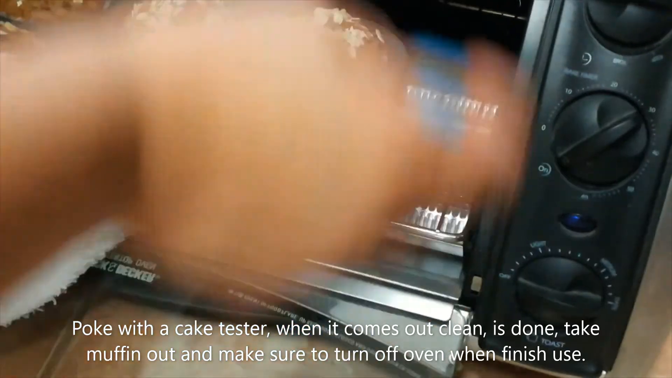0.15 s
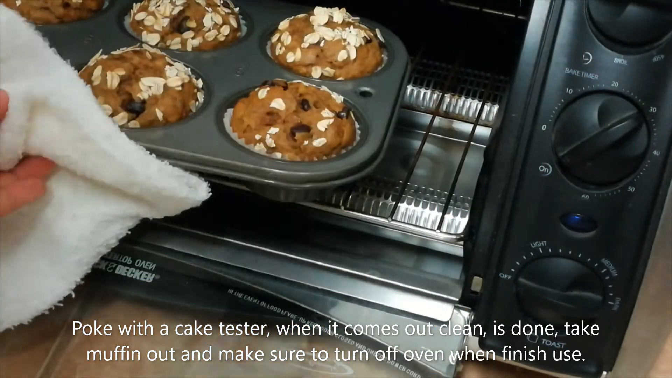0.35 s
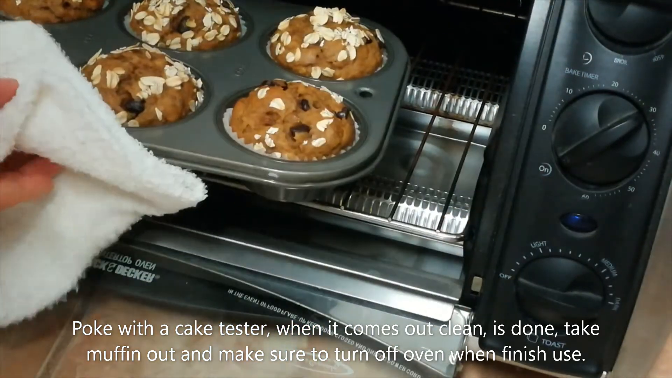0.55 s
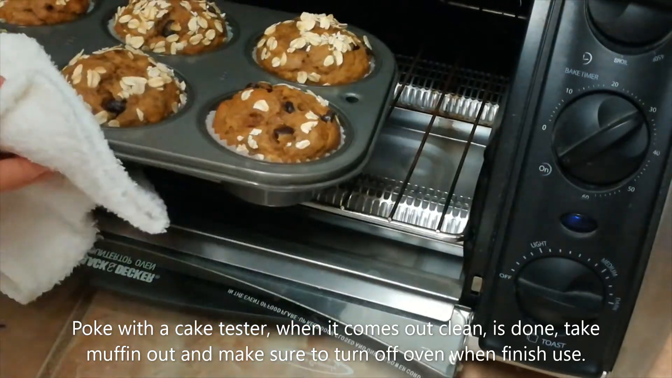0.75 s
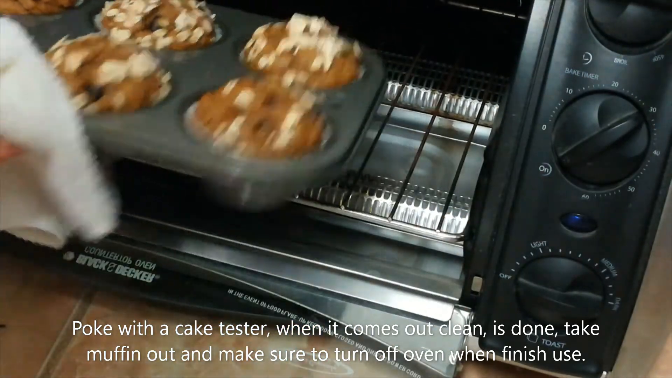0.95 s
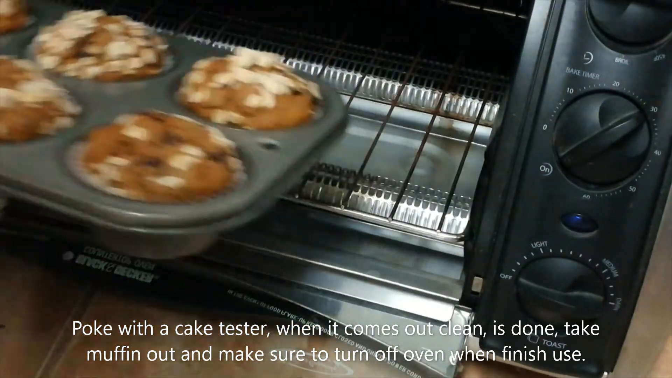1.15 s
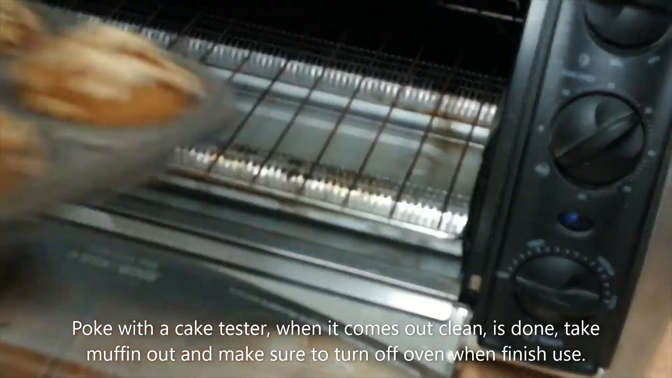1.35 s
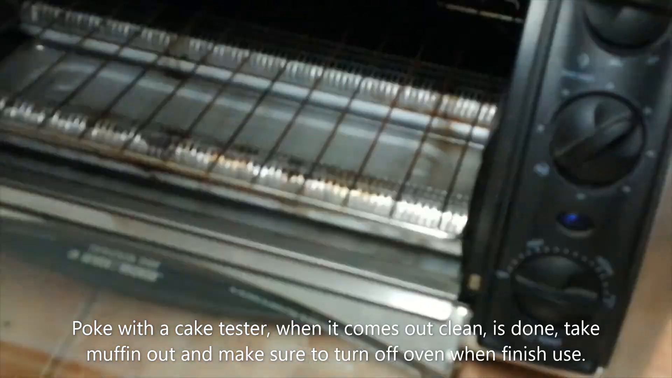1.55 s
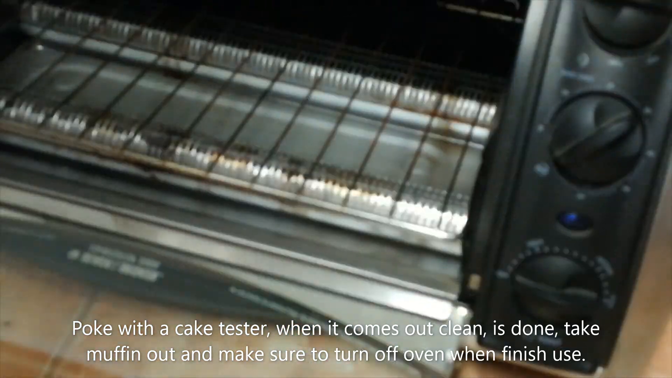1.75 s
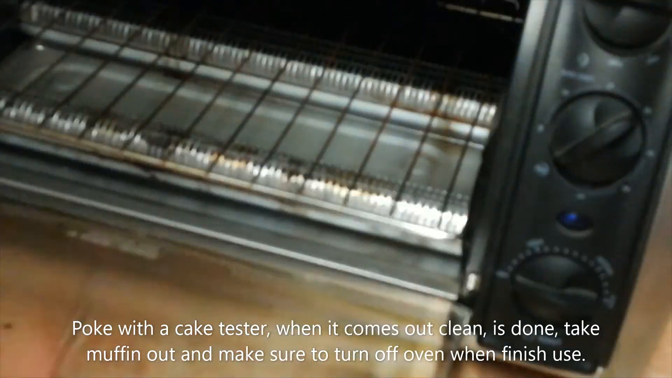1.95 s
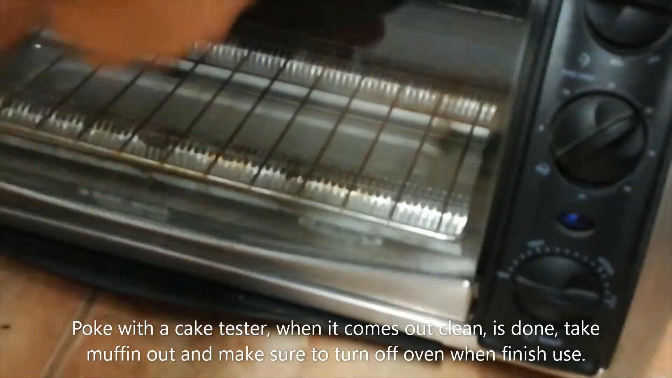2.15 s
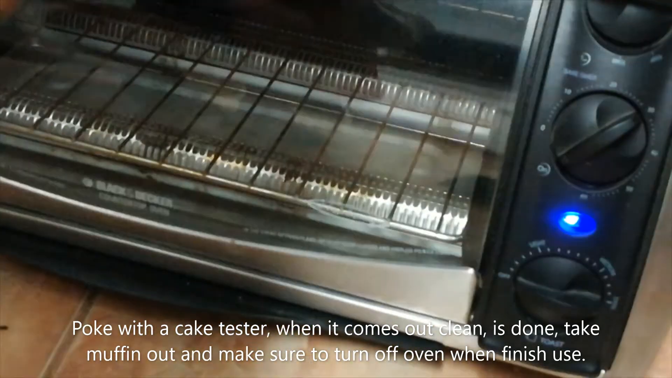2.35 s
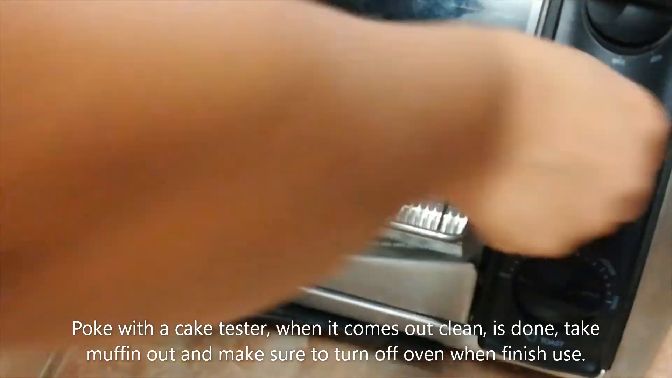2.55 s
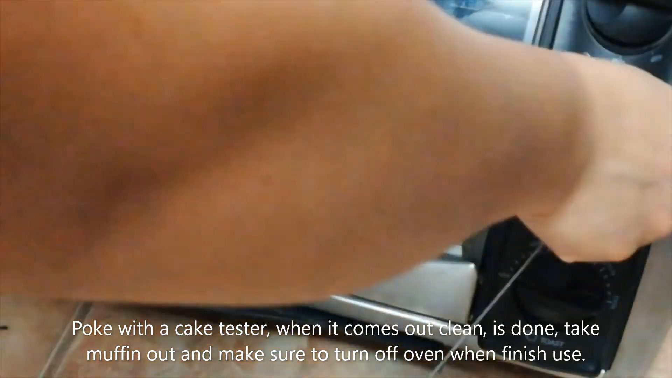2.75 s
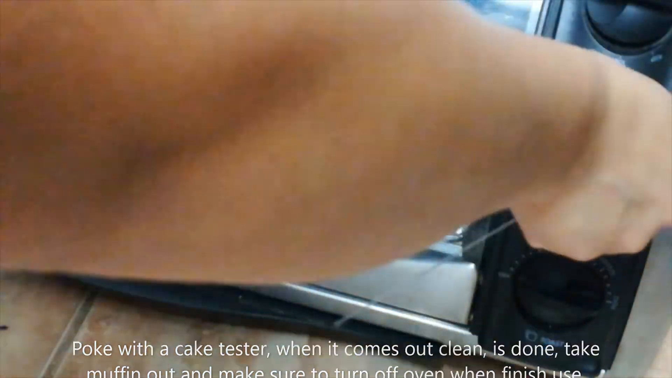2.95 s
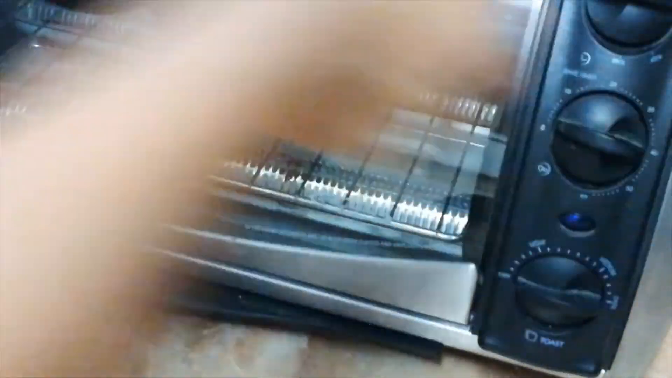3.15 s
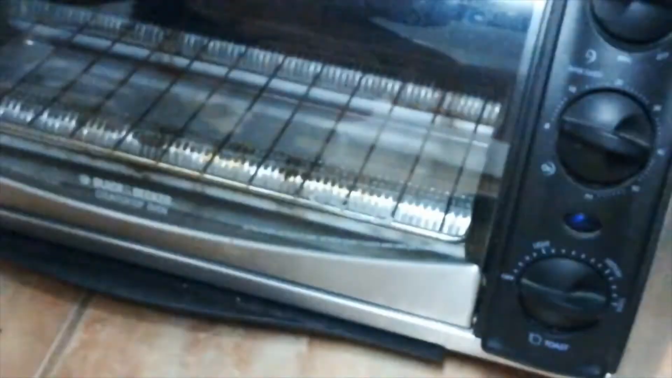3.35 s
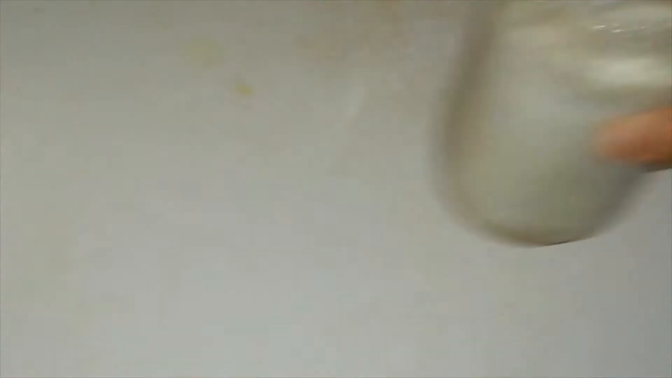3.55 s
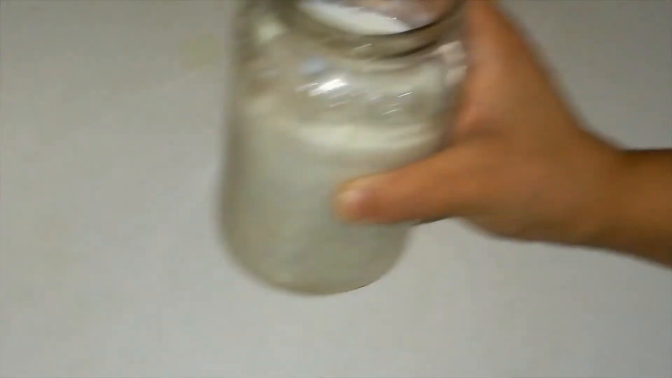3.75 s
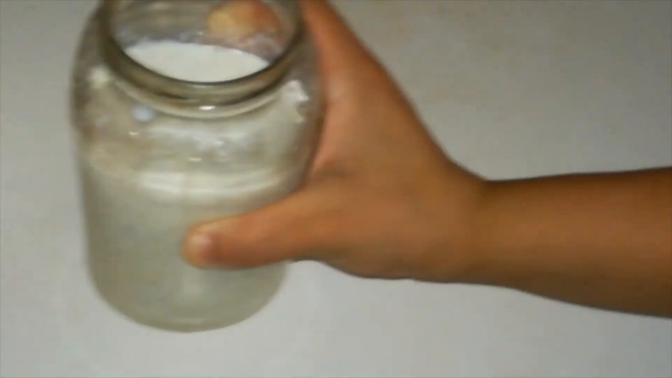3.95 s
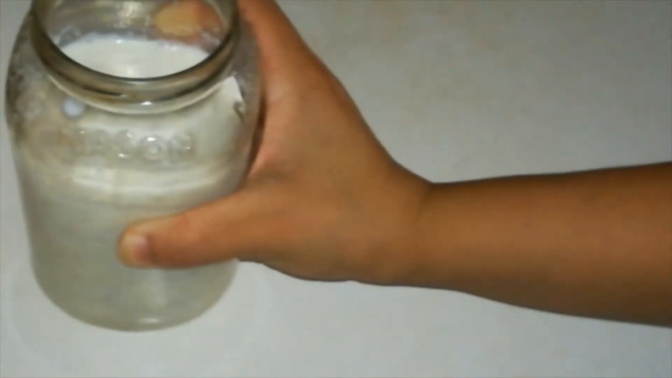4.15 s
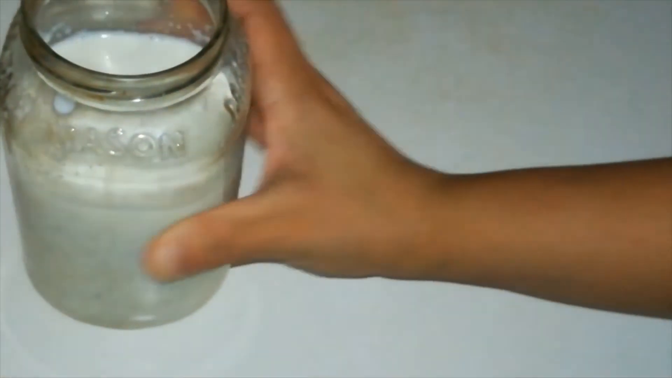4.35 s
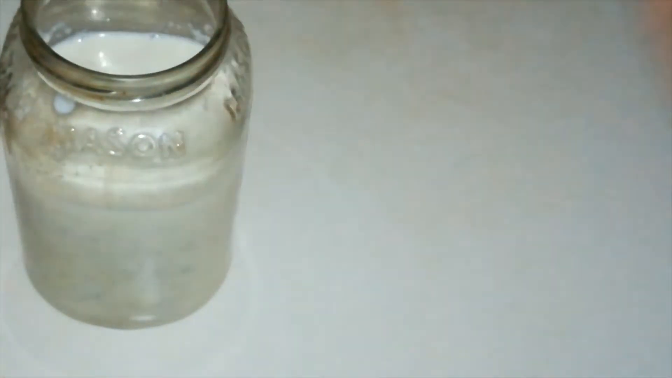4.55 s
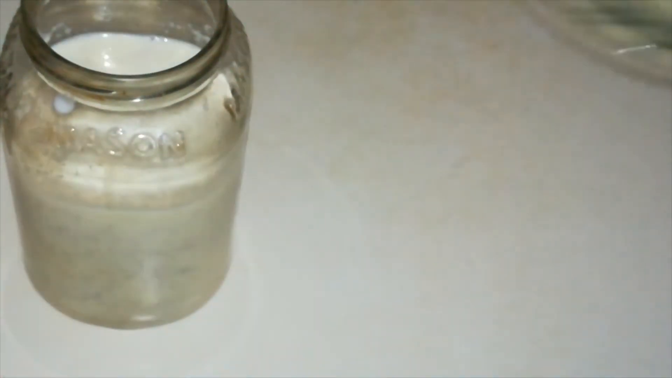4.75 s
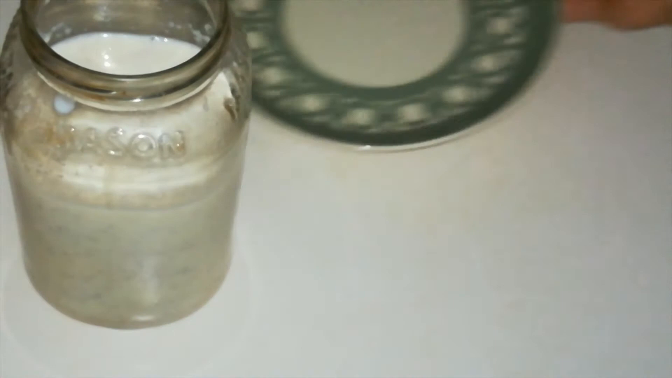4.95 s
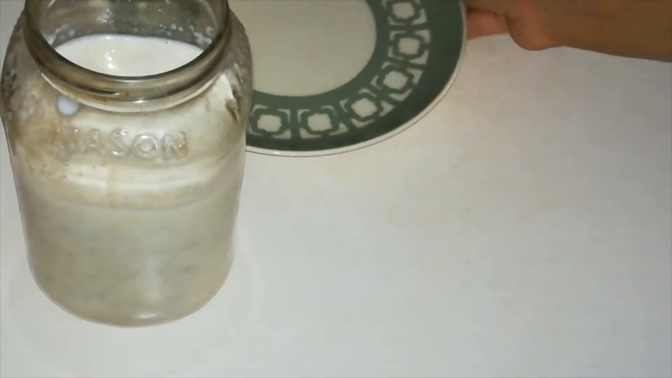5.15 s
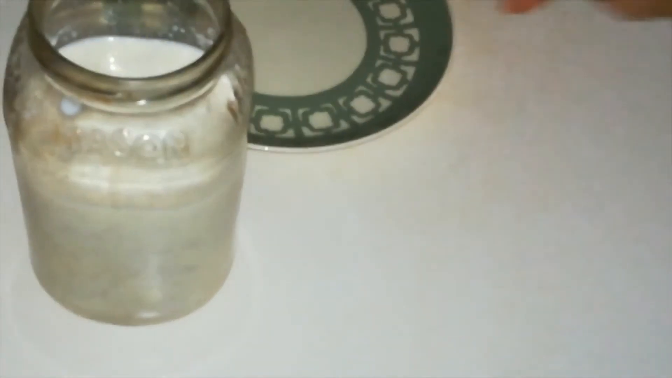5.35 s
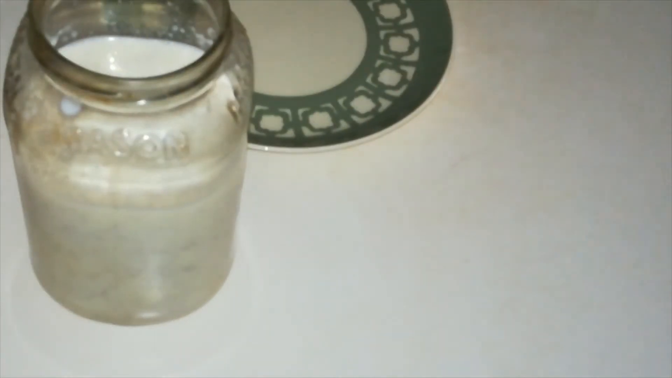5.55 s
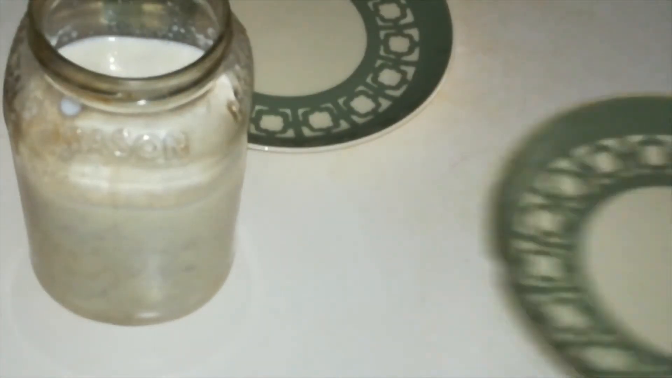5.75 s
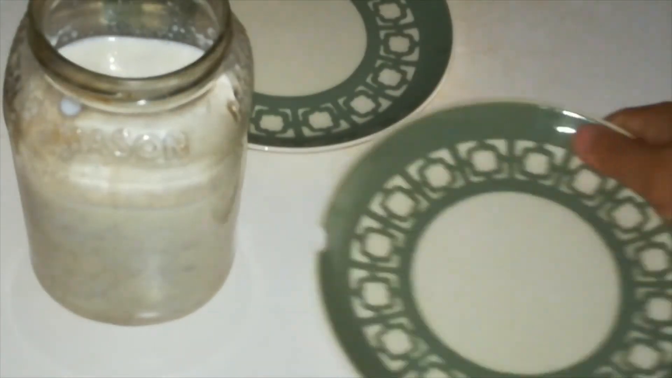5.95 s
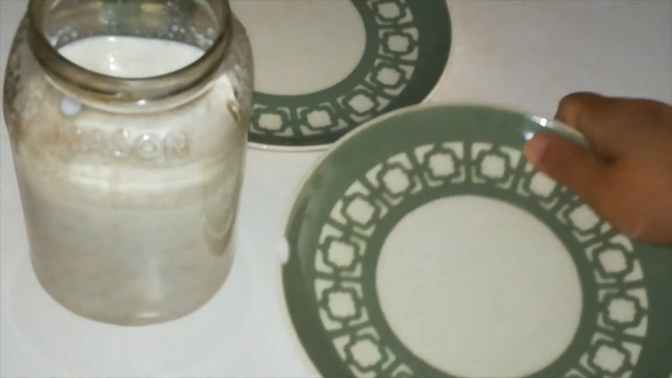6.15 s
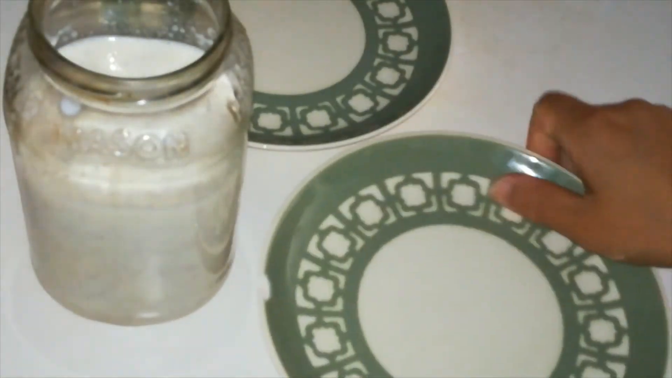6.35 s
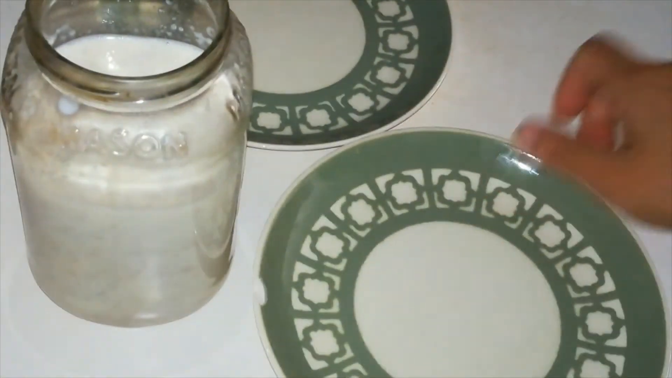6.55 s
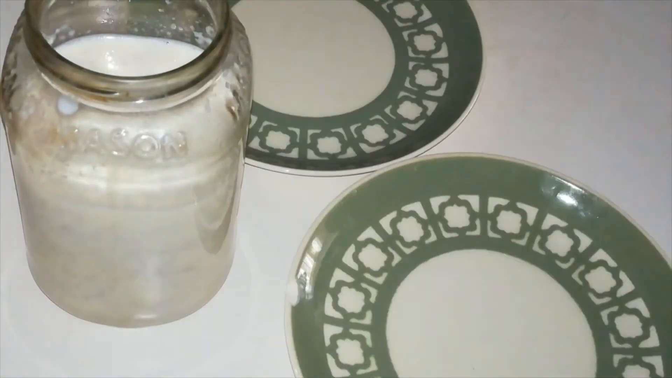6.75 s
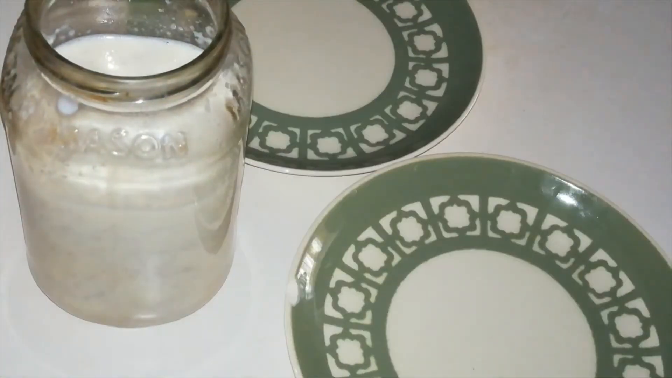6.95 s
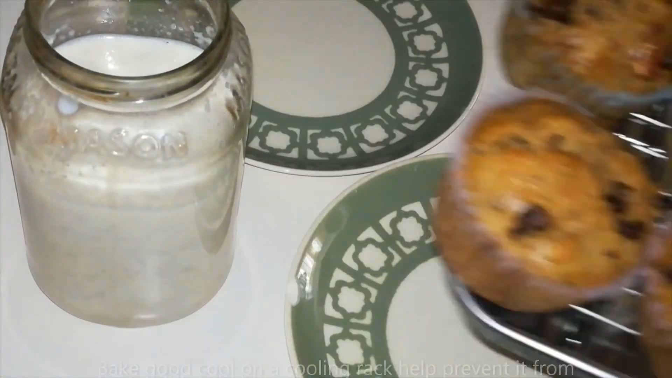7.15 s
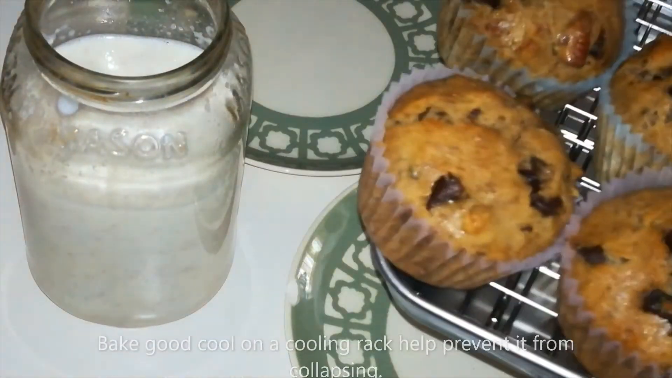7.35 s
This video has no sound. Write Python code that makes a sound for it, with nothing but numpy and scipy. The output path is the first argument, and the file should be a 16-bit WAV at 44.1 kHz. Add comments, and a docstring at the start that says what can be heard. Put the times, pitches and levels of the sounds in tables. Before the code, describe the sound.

First, steady oven hum, soft wire-rack taps and a dry tray scrape; then a brief hinge chirp, rasping metal, a heavy sheet-metal door bang and one clear timer ding with ratchety knob noise. After a short silent join, near-quiet room tone holds a muffled double knock of a filled glass jar, then clattering ceramic plates on a hard tabletop. Near microphones, short indoor reflections, and soft low thumps after the first and last cuts.

```python
"""An oven hums; a baking tray touches and slides off its rack, the door squeaks and slams, a timer knob turns to its bell.
Then, in a quieter room, a full glass jar and two plates are set down on a table, and room tone remains.
Struck bodies are sums of decaying modes; dense clatter and rubbing are shaped noise; a squeak is a harmonic tone.
Short fades join the passages; the microphone settles with a slow thump after the first and last joins."""
import sys
import numpy as np
from scipy import signal
from scipy.fft import rfft, irfft
from scipy.io import wavfile

SR = 44100
rng = np.random.default_rng(int(sys.argv[2]) if len(sys.argv) > 2 else 0)


def digitize_waveform(pressure):
    """Quantize a signal to 16-bit integers and store it at the path in sys.argv[1].

    Rows of a 2-D input are taken as channels; values are limited to [-1, 1].
    """
    field = np.atleast_2d(pressure).T
    bounded = np.clip(field, -1, 1)
    quanta = np.round(bounded * 32767).astype(np.int16)
    wavfile.write(sys.argv[1], SR, quanta)


N = 325678

# Steady hum of the oven: pitch_hz, density_db_per_hz
OVEN_HUM = [(12, -30), (20, 4), (49, -7), (154, -0.5), (241, -9), (357, -5.5), (422, -17.5), (558, -9),
            (607, -24), (698, -8), (825, -14.5), (1480, -16.5), (2080, -23.5), (8890, -25.5),
            (16000, -37.5)]
# Steady tone of the quieter room: pitch_hz, density_db_per_hz
ROOM_TONE = [(12, -37), (20, 1.5), (27, -10.5), (96, -6.5), (134, -12.5), (377, -21.5), (410, -25),
             (446, -15.5), (1090, -20.5), (1400, -21), (1810, -23), (2320, -23.5), (2530, -23), (8410, -24),
             (16000, -34.5)]
OVEN_DB, ROOM_DB = -59, -64.5   # mean levels

# Tray and rack touching: start_s, level_db, favoured_hz, falloff_db_per_octave
TOUCHES = [(0.018, -54, 1470, 30), (0.161, -59, 1380, 22), (0.274, -46.5, 1110, 20), (0.4, -42, 1930, 30),
           (0.447, -55, 1580, 16), (0.625, -46.5, 1500, 14), (0.632, -46, 2890, 25), (0.721, -56, 1600, 8),
           (0.9, -56.5, 1460, 12), (1.087, -55.5, 1430, 8), (1.169, -61, 1530, 16), (1.24, -55.5, 1610, 13),
           (1.4, -59, 1460, 12), (2.243, -42, 1700, 30)]
# Modes of the wire rack: pitch_hz, level_db, t60_s
RACK_MODES = [(995, 4, 0.094), (1111, -1.5, .1), (1190, 2, 0.055), (1479, 0, 0.13), (1584, -2.5, 0.084),
              (1890, -4.5, 0.071), (2056, -8.5, .08), (2886, -5, 0.077), (3550, -5, .06), (3775, -5, 0.07)]
# Scuff of the tray edge on wire: pitch_hz, density_db_per_hz
SCUFF_SPECTRUM = [(600, -22), (1100, -0.5), (2000, 0), (3800, -9), (6000, -20)]
SCUFF_DB = -11.5   # against the ring of the touch

# Metal sliding on metal, for tray, door and knob, and the rattle after the slam: top_s, level_db, rise_20db_s,
# fall_20db_s
SCRAPES = [(0.412, -61, .03, .2), (0.51, -66, .15, .05), (0.746, -60, .15, .07), (0.83, -66, .04, .09),
           (1.008, -44, .03, .11), (1.853, -62, .012, .1), (2.04, -42.5, .21, .19), (2.37, -57, .03, .08),
           (2.55, -48, .06, .19), (2.838, -45, .05, .12), (3.27, -60, .5, .4)]
# Rasp of the rubbing metal: pitch_hz, density_db_per_hz
RASP_SPECTRUM = [(410, -37.5), (700, -6.5), (818, -6.5), (980, -13.5), (1780, -6.5), (2130, -10),
                 (4030, -9.5), (4580, -13), (5220, -11), (9720, -15.5), (15500, -38)]
# Panels shaken by the handling: top_s, level_db, rise_20db_s, fall_20db_s
RUMBLES = [(0.43, -58.5, .13, .12), (0.746, -57, .15, .2), (0.92, -60, .08, .3), (1.1, -57, .3, .1),
           (1.88, -50, .04, .13), (2.04, -53.5, .4, .25), (2.24, -58, .04, .12), (2.424, -40, .015, .03),
           (2.6, -47, .15, .3), (2.9, -47, .035, .15), (3.13, -57, .15, .2), (3.3, -63, .2, .3)]
# Dull rumble of the panels: pitch_hz, density_db_per_hz
RUMBLE_SPECTRUM = [(120, -5.5), (200, -4), (340, 3.5), (470, -1), (800, -28.5)]

# Snaps of rack, latch and clockwork: start_s, level_db, t60_s
CLICKS = [(0.9925, -46.5, 0.17), (2.2428, -55, 0.29), (2.3438, -44, 0.12), (2.8004, -45, 0.45),
          (2.8798, -25, 0.25), (2.9683, -42, 0.11), (3.2974, -58, 0.12), (3.3787, -56.5, 0.16)]
# Colour of a snap: pitch_hz, density_db_per_hz
SNAP_SPECTRUM = [(150, -24), (300, -3.5), (1000, -9), (2400, -6.5), (4000, -7), (6000, -10), (8500, -0.5),
                 (11000, -12.5), (15500, -22)]

# Slips of the hinge: top_s, level_db
SLIPS = [(1.855, -25), (1.869, -34), (1.881, -38.5), (1.898, -40), (1.914, -41.5)]
# Harmonics of the squeak: multiple, level_db
SQUEAK_HARMONICS = [(1, -1.5), (2, -9.5), (3, -21), (4, -34)]
SQUEAK_HZ = 3137
SLIP_RISE_S, SLIP_FALL_S = .011, .006
HINGE_PAN_DB = 4   # louder on the left

# Door meeting its frame: start_s, level_db
SLAMS = [(2.422, -46.5), (2.43, -34), (2.4342, -13)]
# Modes of the oven cabinet: pitch_hz, level_db, t60_s
CABINET_MODES = [(129, -19, .3), (200, -2, 0.085), (227, -4, .07), (330, -18.5, 0.55), (541, -19, .2),
                 (660, -20, 0.25)]
# Crash of the sheet metal: pitch_hz, density_db_per_hz
CRASH_SPECTRUM = [(90, -33.5), (140, -9.5), (230, -3.5), (450, -13.5), (900, -16.5), (1500, -16.5),
                  (2400, -19.5), (4600, -21), (8000, -23), (12000, -31), (15500, -38.5)]
# Decay of the sheet metal: pitch_hz, t60_s
CRASH_T60 = [(100, .5), (300, .7), (1000, 1), (3000, .55), (8000, .5), (14000, .35)]
CRASH_DB = -18.5   # against the ring of the cabinet

# Modes of the timer bell, whose split pairs beat: pitch_hz, level_db, t60_s
BELL_MODES = [(2461, -21, .7), (4014.5, -19.5, 1.3), (4024.5, -38, 5), (4180, -43, 1.5), (9538, 0, .9),
              (9539.4, -6.5, .9), (14462, -36, .9)]
STROKE_S, STROKE_DB = 2.881, -16   # hammer on bell
BELL_WET_DB = -17   # the bell is close

# Things set down: start_s, thing, thud_db, thud_favoured_hz, clack_db, clack_tilt_db_per_octave,
# ring_db, ring_favoured_hz, falloff_db_per_octave, share_of_free_ring_time
LANDINGS = [(3.988, "jar", -23.5, 300, -56, 1, -75, 3760, 7.5, .5),
            (3.995, "jar", -62, 306, -51, 3.5, -57, 3760, 5, .5),
            (4.013, "jar", -26, 310, -50, -1.5, -72, 3800, 4.5, .5),
            (4.094, "jar", -39, 290, -60, -2, -31, 345, 14, .6),
            (5.042, "first plate", -27, 480, -36.5, -.5, -43, 3750, 5, .45),
            (5.096, "first plate", -23.5, 450, -35.5, .5, -45, 5000, 2, .45),
            (5.211, "first plate", -33, 475, -54.5, -4.5, -66, 3725, 3.5, .5),
            (5.219, "first plate", -55, 470, -50.5, -4, -52, 3280, 6, .6),
            (5.234, "first plate", -49, 480, -44.5, -2, -51, 3300, 5, .6),
            (5.259, "first plate", -21.5, 560, -26, -1.5, -27.5, 2500, 1.5, .88),
            (5.888, "second plate", -24.5, 600, -23.5, -2, -36, 6080, 8, .62),
            (5.992, "second plate", -22, 580, -21.5, -1, -33, 4000, .9, .35),
            (6.029, "second plate", -35, 280, -29, 3, -26.5, 3800, 2.6, .55),
            (6.310, "second plate", -42, 327, -42.5, 2, -43, 3000, 1.5, .28),
            (6.315, "second plate", -34, 328, -36.5, -1, -35.5, 2600, 1.4, .25),
            (6.444, "second plate", -53, 330, -53, 1, -41, 2850, 14, .6)]
# Modes of the table top: pitch_hz, level_db, t60_s
TABLE_MODES = [(168.1, -0.5, 0.17), (241, -3.5, 0.13), (310.7, -0.5, 0.055), (368, -15, .07),
               (480, -4, 0.045), (680, -5, 0.035)]
# Modes of the glass jar, damped by its filling: pitch_hz, level_db, t60_s
JAR_MODES = [(347, 0, .1), (2140, -12, 0.11), (3230, 5, 0.074), (3360, 1, 0.066), (3790, 11, 0.04)]
# Modes of the first plate: pitch_hz, level_db, t60_s
FIRST_PLATE_MODES = [(1238, -2, .28), (1720, -10, .12), (2153, -14, .12), (2794, -6, 0.27), (3725, .5, 0.2),
                     (4404, -11, .15), (5825, -8, .1), (6282, -8, 0.12), (8452, -7, .11), (8656, -11, 0.13),
                     (11600, -11, .08)]
# Modes of the second plate: pitch_hz, level_db, t60_s
SECOND_PLATE_MODES = [(1241, -1.5, .16), (1710, -6, 0.26), (2163, -2.5, 0.08), (2674, -5.5, 0.17),
                      (2750, -9, .16), (2780, -11, .22), (4097, -1, 0.12), (4345, -12, 0.15),
                      (4390, -8, .2), (6010, -1.5, 0.087), (6430, -8.5, .14), (7700, -9.5, 0.059),
                      (8516, -7, .12), (9140, -9, 0.1), (9600, -22.5, 0.39), (11730, -12, 0.14)]
# Table top under a hard edge: pitch_hz, density_db_per_hz
CLACK_SPECTRUM = [(200, -23), (450, -9.5), (700, -4), (1000, -7), (1550, -2.5), (2200, -11.5),
                  (3300, -18.5), (6000, -21), (9000, -24.5), (12000, -31), (15500, -46)]
# Decay of clacks and scuffs: pitch_hz, t60_s
CLACK_T60 = [(300, .15), (700, 0.18), (1500, 0.16), (3000, 0.17), (8000, 0.1), (14000, .08)]
RISE_CYCLES = 2.2   # time constant of a ring's rise, in swings of the favoured pitch

# Reflections of the walls: pitch_hz, density_db_per_hz
WALL_SPECTRUM = [(60, -26.5), (200, -12.5), (600, -1.5), (8000, 3), (16000, -5)]
# Decay of the reflections: pitch_hz, t60_s
WALL_T60 = [(150, .2), (1000, .19), (4000, .17), (12000, .11)]
# Left-right likeness of sustained sounds: pitch_hz, likeness (1 alike, -1 opposed)
LIKENESS = [(25, .75), (60, .88), (130, .9), (290, 0.91), (640, -0.57), (1400, .05), (3000, -0.11)]
# Left-right likeness of blows close by: pitch_hz, likeness
NEAR_LIKENESS = [(130, .99), (290, .9), (640, .2), (1400, .2), (3000, .1)]
TRAVEL_S = .6 / 343   # source to microphones
BODY_CUT_HZ = 110   # small panels radiate little deep bass

# Microphone offset drifting back: start_s, depth_db, recovery_s
SETTLING = [(3.45, -45.5, .04), (6.899, -37.5, 0.13)]
# Silent joins: start_s, end_s, fade_in_s
JOINS = [(3.445, 3.452, .033), (4.668, 4.678, .033), (6.775, 6.906, .0005)]
FIRST_CUT_S, FADE_OUT_S = 3.448, .034
STOP_EDGE_HZ = 16800   # 70 dB down from here up


def from_db(db):
    """Decibels are logarithms of amplitude: 20 dB is a factor of ten."""
    return 10 ** (np.asarray(db) / 20)


def at_hz(points, hz):
    """Pitch is logarithmic: a table is interpolated along log frequency."""
    pitch_hz, values = np.array(points).T
    return np.interp(np.log(hz), np.log(pitch_hz), values)


def add(out, sound, s):
    """Superposition: a stereo sound is added after its travel time through air."""
    at = round((s + TRAVEL_S) * SR)
    out[:, at:at + sound.shape[1]] += sound[:, :N - at]


def drift(rate_hz):
    """Slow random fluctuation: lines join random knots of spread 1."""
    knots = rng.standard_normal(N // 64)
    return np.interp(np.arange(N) * rate_hz / SR, np.arange(len(knots)), knots)


def swells(rows):
    """Exponential growth and decay: each stroke rises to its top and fades evenly in dB."""
    t = np.arange(N) / SR
    return sum(from_db(db - 20 * np.maximum((s - t) / rise, (t - s) / fall)) for s, db, rise, fall in rows)


def noise(spectrum, size, grains=1, likeness=LIKENESS):
    """Partial coherence: mid and side noises set the likeness of the channels, at rms 1."""
    hz = np.maximum(np.arange(size // 2 + 1) * SR / size, 1)
    mid, side = rfft(rng.standard_normal((2, size)) * grains) * from_db(at_hz(spectrum, hz))
    alike = np.clip(at_hz(likeness, hz), -1, 1)
    out = irfft(np.sqrt(1 + alike) * mid + np.sqrt(1 - alike) * side * [[1], [-1]], size)
    return out / np.sqrt(np.mean(out ** 2))


def burst(spectrum, t60s, crack_db, crack_s=0.015, rise_s=0.00062, size=16384):
    """High modal density: modes too dense to tell apart are a crack, then noise dying octave by octave."""
    spectra = rfft(noise(spectrum, size, likeness=NEAR_LIKENESS))
    t = np.arange(size) / SR
    octave = np.log2(np.arange(1, size // 2 + 2) * SR / size / 100)
    crack = from_db(crack_db - 60 * t / crack_s)
    out = 0
    for k in range(9):
        share = np.clip(1 - np.abs(octave - k), 0, 1)   # overlapping octave bands
        decay = from_db(-60 * t / at_hz(t60s, 100 * 2 ** k))
        out = out + irfft(spectra * share, size) * (decay + crack)
    return out * (1 - np.exp(-t / rise_s))


def ring(modes, level_db, rise_s, favoured_hz=1000, falloff_db=0, free=1, apart=1, punch=1.2):
    """Modal excitation: a blow drives modes near its favoured pitch most, and each decays exponentially."""
    hz, mode_db, t60 = np.transpose(modes)[:, :, None]
    t = np.arange(round(min(t60.max(), .7) * SR)) / SR
    excitation_db = level_db + mode_db - falloff_db * np.abs(np.log2(hz / favoured_hz))
    gain = from_db(excitation_db - 60 * t / (t60 * free))
    # the microphones differ in level and phase, more in the treble
    unlike = apart * (1 - np.clip(at_hz(NEAR_LIKENESS, hz), 0, 1))
    mic_db, mic_phase = unlike * rng.standard_normal((2, 2, len(hz), 1))
    waves = from_db(mic_db) * np.sin(2 * np.pi * hz * t + mic_phase)
    contact = (1 - np.exp(-t / rise_s)) * (1 + punch * np.exp(-t / 0.0062))   # the first swings are driven
    return (gain * waves).sum(axis=1) * contact


def room(x, wet_db):
    """Reverberation: dense reflections, less alike in the treble, blur every ring by convolution."""
    high_pass = signal.butter(2, BODY_CUT_HZ, "high", fs=SR, output="sos")
    x = signal.sosfilt(high_pass, x + 1e-18)
    echo = burst(WALL_SPECTRUM, WALL_T60, crack_db=-11.5, rise_s=0.0017)
    echo = echo / np.sqrt(np.mean(np.sum(echo ** 2, axis=1)))   # unit energy
    return x + from_db(wet_db) * signal.fftconvolve(x, echo, axes=1)[:, :N]


def oven_hum():
    """Stationary noise: a fixed spectrum whose level wanders slightly."""
    return from_db(OVEN_DB + .8 * drift(7)) * noise(OVEN_HUM, N)


def touches():
    """Impact of metal on wire: rack modes ring while the contact scuffs; returns both."""
    rings, scuffs = np.zeros((2, N)), np.zeros((2, N))
    for s, db, favoured_hz, falloff_db in TOUCHES:
        add(rings, ring(RACK_MODES, db, 0.0043, favoured_hz, falloff_db, punch=0), s)
        scuff = burst(SCUFF_SPECTRUM, CLACK_T60, crack_db=-1, rise_s=0.0036, size=8192)
        add(scuffs, from_db(db + SCUFF_DB) * scuff, s)
    return rings, scuffs


def slides():
    """Sliding friction: uneven grains of rubbing, and the dull rumble of the panels under them."""
    grains = from_db(2.5 * rng.exponential(1, N) + 2.0 * drift(65))
    rasp = swells(SCRAPES) * noise(RASP_SPECTRUM, N, grains)
    rumble = swells(RUMBLES) * from_db(2.6 * drift(40)) * noise(RUMBLE_SPECTRUM, N)
    return rasp + rumble


def clicks():
    """Brief impulses: each snap excites dense modes whose treble dies sooner."""
    out = np.zeros((2, N))
    for s, db, t60 in CLICKS:
        snap = burst(SNAP_SPECTRUM, [(300, t60), (12000, .7 * t60)], crack_db=-7.0)
        add(out, from_db(db) * snap, s)
    return out


def hinge():
    """Stick and slip: swells of a slightly wavering harmonic squeal."""
    t = np.arange(N) / SR
    swell = sum(from_db(db) * np.interp(t, [s - SLIP_RISE_S, s, s + SLIP_FALL_S], [0, 1, 0]) for s, db in SLIPS)
    phase = 2 * np.pi * np.cumsum(SQUEAK_HZ * (1 + 0.007 * drift(90))) / SR
    squeal = np.zeros((2, N))
    for side in range(2):
        for k, db in SQUEAK_HARMONICS:
            squeal[side] += from_db(db) * np.sin(k * phase + rng.normal(0, 0.95))
    return swell * squeal * from_db([[HINGE_PAN_DB / 2], [-HINGE_PAN_DB / 2]])


def slam():
    """Impact of door on frame: cabinet modes ring while sheet metal crashes; returns both."""
    rings, crashes = np.zeros((2, N)), np.zeros((2, N))
    for s, db in SLAMS:
        add(rings, ring(CABINET_MODES, db, rise_s=0.0024), s)
        crash = burst(CRASH_SPECTRUM, CRASH_T60, crack_db=13.5, crack_s=0.2, size=32768)
        add(crashes, from_db(db + CRASH_DB) * crash, s)
    return rings, crashes


def timer_bell():
    """Beating modes: one hammer stroke rings the bell, whose close pairs of modes interfere."""
    out = np.zeros((2, N))
    add(out, ring(BELL_MODES, STROKE_DB, rise_s=.005, apart=.25, punch=0), STROKE_S)
    return out


def oven():
    """Superposition of the oven's sources: rings reverberate, the bell less as it is close."""
    rack_rings, scuffs = touches()
    cabinet_rings, crashes = slam()
    direct = oven_hum() + scuffs + slides() + clicks() + crashes
    rings = rack_rings + hinge() + cabinet_rings
    return direct + room(rings, wet_db=-7) + room(timer_bell(), BELL_WET_DB)


def room_tone():
    """Stationary noise: the quieter room's spectrum with a slightly wandering level."""
    return from_db(ROOM_DB + 1.2 * drift(4.5)) * noise(ROOM_TONE, N)


def landings():
    """Coupled impact: table top and thing ring, and a hard edge clacks; returns rings and clacks."""
    rings, clacks = np.zeros((2, N)), np.zeros((2, N))
    modes = {"jar": JAR_MODES, "first plate": FIRST_PLATE_MODES, "second plate": SECOND_PLATE_MODES}
    for s, thing, thud_db, thud_hz, clack_db, tilt_db, ring_db, ring_hz, falloff_db, free in LANDINGS:
        add(rings, ring(TABLE_MODES, thud_db, 0.0021, thud_hz, falloff_db=9.5), s)
        # harder edges are brighter
        spectrum = [(hz, db + tilt_db * np.log2(hz / 1500)) for hz, db in CLACK_SPECTRUM]
        clack = burst(spectrum, CLACK_T60, crack_db=2.5, size=8192)
        add(clacks, from_db(clack_db) * clack, s)
        # a grip shortens the ring
        add(rings, ring(modes[thing], ring_db, RISE_CYCLES / ring_hz, ring_hz, falloff_db, free), s)
    return rings, clacks


def table():
    """Superposition at the table: room tone and clacks, with the rings reverberating."""
    rings, clacks = landings()
    return room_tone() + clacks + room(rings, wet_db=-6.5)


def scene():
    """Succession of two sound fields: the oven until the first cut, then the table."""
    return np.where(np.arange(N) < FIRST_CUT_S * SR, oven(), table())


def record(dry):
    """Offset recovery and band limiting: the microphone settles, fades join the passages, the top is cut."""
    t = np.arange(N) / SR
    thump = sum(from_db(db) * np.interp(t, [s, s + .001, s + .03, s + 0.033 + back], [0, 1, 1, 0])
                for s, db, back in SETTLING)
    fades = [np.interp(t, [s - FADE_OUT_S, s, end, end + rise], [1, 0, 0, 1]) for s, end, rise in JOINS]
    faded = (dry - thump) * np.prod(fades, axis=0)
    low_pass = signal.cheby2(12, 70, STOP_EDGE_HZ, fs=SR, output="sos")
    return signal.sosfilt(low_pass, faded)


dry = scene()
out = record(dry)
digitize_waveform(out)
```